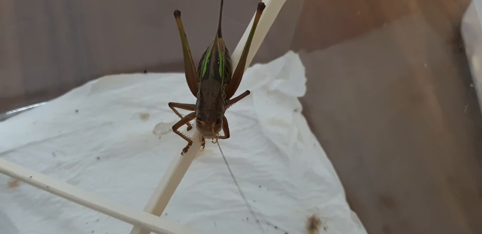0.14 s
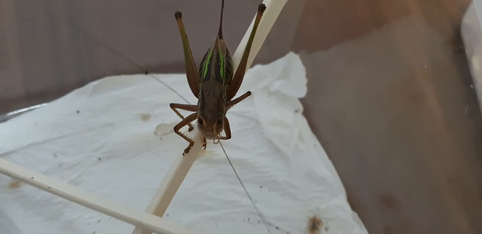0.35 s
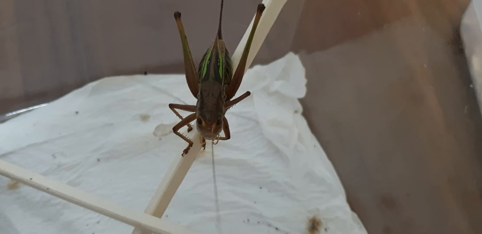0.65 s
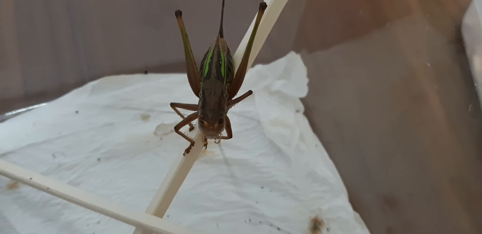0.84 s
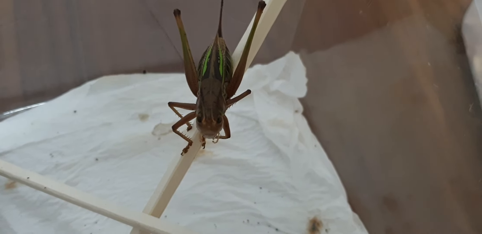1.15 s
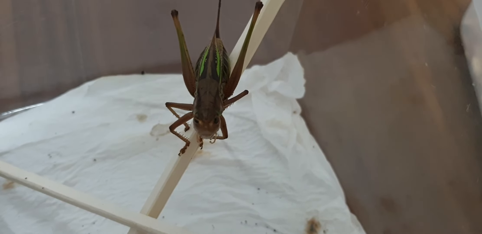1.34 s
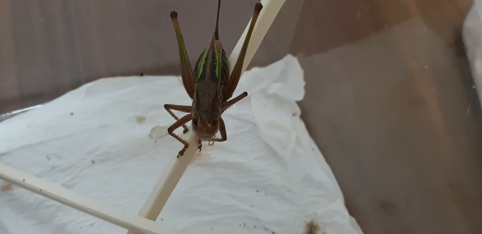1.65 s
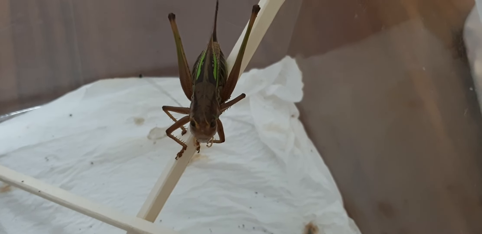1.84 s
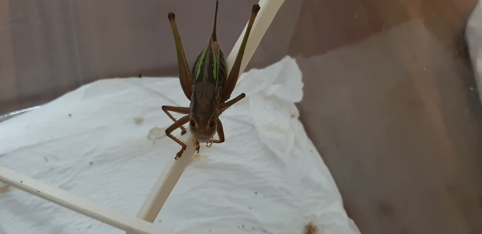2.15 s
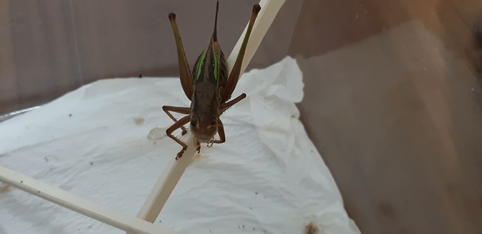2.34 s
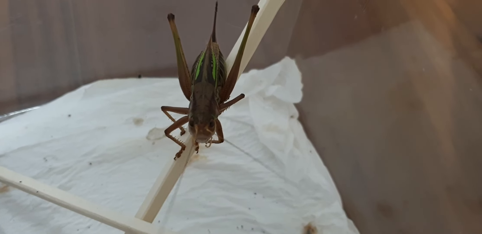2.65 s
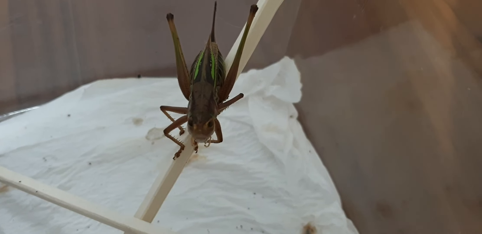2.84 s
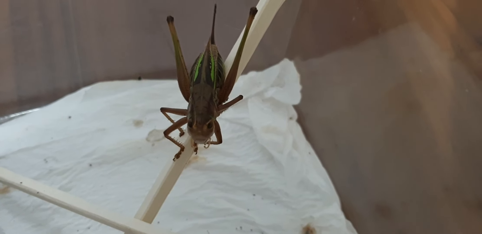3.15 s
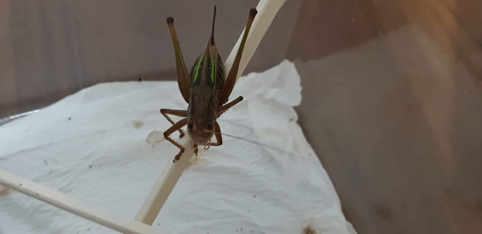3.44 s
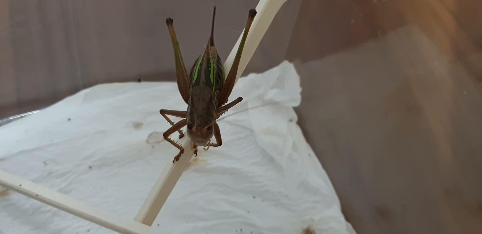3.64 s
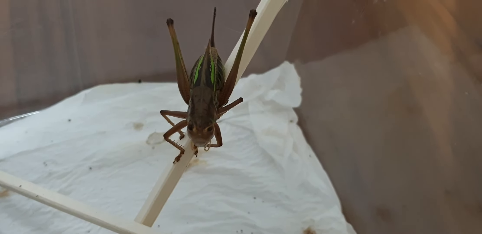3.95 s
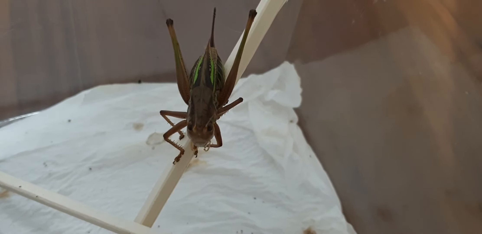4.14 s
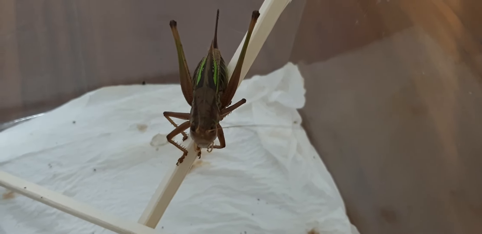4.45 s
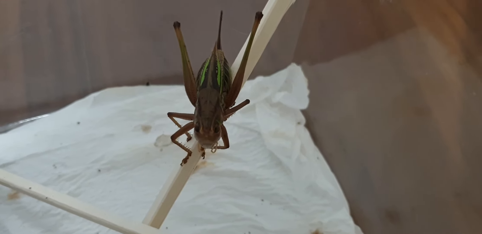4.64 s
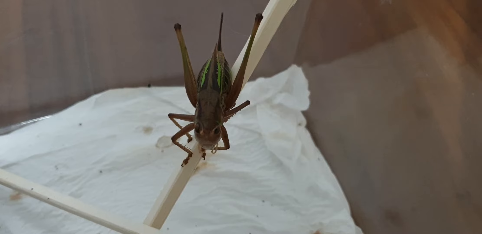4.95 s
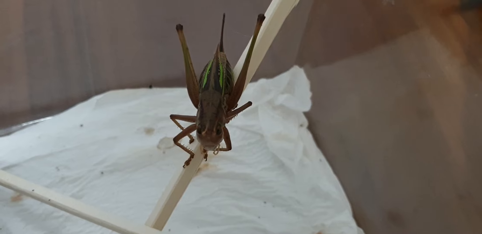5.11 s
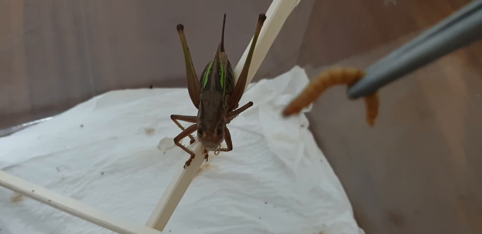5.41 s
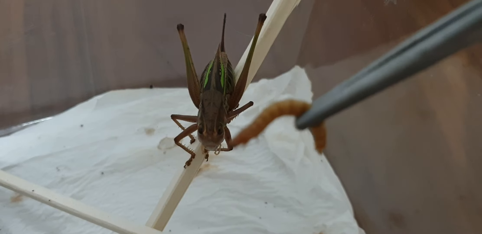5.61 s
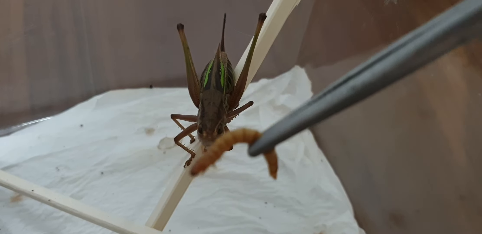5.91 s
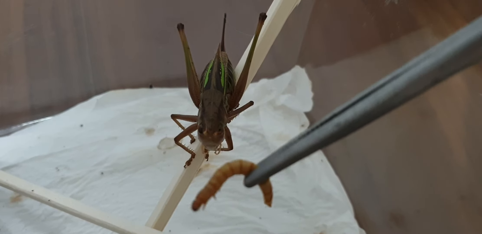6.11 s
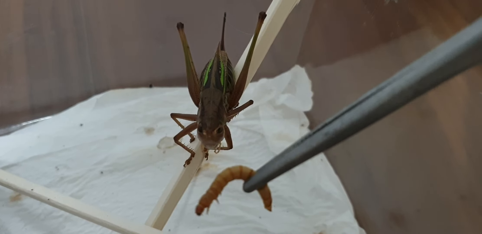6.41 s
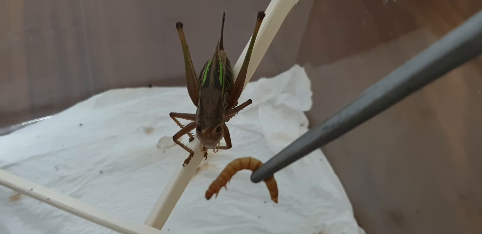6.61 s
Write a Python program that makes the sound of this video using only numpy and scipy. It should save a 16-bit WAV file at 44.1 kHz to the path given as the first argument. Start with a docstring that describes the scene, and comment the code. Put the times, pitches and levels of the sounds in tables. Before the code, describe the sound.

In a quiet indoor room with a low motor hum, a hand handles steel tweezers close by: soft skin and cloth rustle, dry ticks, a brief metallic chatter and faint high ringing. A small tub is tapped near two seconds as the hum swells and stays louder. Sparse rustles follow, then a sharp plastic box knock and a duller one. Close stereo phone microphone, little room echo.

```python
"""A quiet room hums (shaped noise, motor tones) while a hand to the right of a phone handles steel tweezers.
Skin and cloth rustle (banded grains); the tips tick (noise bursts), chatter and ring (steel modes).
From 1.7 s a small tub is tapped (struck modes and cracks), and around 1.8 s the background swells, then holds.
At 5.0 and 6.1 s a plastic box on the left is knocked, made like the tub; a bright burst edges the first knock."""
import sys
import numpy as np
from scipy import signal
from scipy.fft import rfft, irfft, next_fast_len
from scipy.io import wavfile
from scipy.ndimage import uniform_filter1d

SR = 44100
rng = np.random.default_rng(int(sys.argv[2]) if len(sys.argv) > 2 else 0)


def persist_wave(psi):
    """Save psi, clipped to +-1, as 16-bit WAV."""
    counts = np.round(np.clip(psi, -1, 1) * 32767).astype(np.int16)
    wavfile.write(sys.argv[1], SR, np.atleast_2d(counts).T)


N = 298557  # samples


def undb(db):
    """Gain of a level in dB."""
    return 10 ** (np.asarray(db) / 20)


def unit(x):
    """Scaled to rms 1."""
    return x / np.sqrt(np.mean(x ** 2))


def band(x, centre_hz, width_hz):
    """Two-pole resonance, gain 1 at its centre."""
    b, a = signal.iirpeak(min(centre_hz, 0.45 * SR), centre_hz / width_hz, fs=SR)
    return signal.lfilter(b, a, x)


def walk(rate_hz):
    """Random levels held 1 / rate_hz s, smoothed twice by a moving mean."""
    hold = int(SR / rate_hz)
    steps = np.repeat(rng.standard_normal(N // hold + 1), hold)
    return uniform_filter1d(uniform_filter1d(steps, hold), hold)[:N]


def sides(pan_db):
    """Left and right gains whose mean is 1; pan_db is left minus right."""
    gains = undb(np.array([pan_db, -pan_db]) / 2)
    return (2 * gains / gains.sum())[:, None]


def add(out, x, start_s):
    """Mix x into out from start_s on."""
    i = int(start_s * SR)
    out[:, i:i + x.shape[1]] += x[:, :N - i]


def ring(hz, t60_s, phase_rad=0.0):
    """One struck mode: a sine decaying 60 dB in t60_s."""
    t = np.arange(SR // 2) / SR
    return np.sin(2 * np.pi * hz * t + phase_rad) * np.exp(-np.log(1000) * t / t60_s)


def ticks():
    """Each tick is a short noise burst with its own colour, mostly the tips scraping as they meet."""
    # dry ticks of the tips; the last row is the bright edge of the first box knock:
    # (time [s], level [dB], colour [Hz], left minus right [dB])
    dry_ticks = [(0.1274, -45, 10700, -6.0), (0.375, -57, 9280, -6.5), (.426, -45, 2600, -5),
                 (0.6017, -31, 3770, -9), (0.6056, -26.5, 5950, 0), (0.6275, -36, 4860, -11),
                 (0.6343, -29, 4530, -5), (.6355, -33, 10400, -9), (0.845, -50, 6360, -5.0),
                 (0.9012, -27.5, 3900, -9), (0.9054, -22, 4740, -4), (.879, -46, 5000, -5),
                 (0.9437, -29, 11000, -11), (.9475, -33, 5000, -6), (.956, -38, 4500, -6),
                 (1.265, -54, 12900, 10), (1.7102, -23.5, 4200, -4), (1.7114, -25, 10000, -8),
                 (1.765, -34, 4250, -2), (1.8177, -43, 3000, -4), (1.827, -44, 4500, -4),
                 (1.939, -49, 13900, 3), (1.961, -45, 2580, 4), (2.054, -46, 10000, -8),
                 (2.2615, -51, 2610, -15), (2.296, -34, 6800, -17), (2.336, -44, 5100, -10),
                 (2.373, -39.5, 9000, -18.5), (2.6988, -41, 2480, -12), (2.8702, -47.5, 2500, -2),
                 (2.99, -36, 2890, 2), (2.9957, -33.5, 6000, -12), (4.865, -47.5, 13300, 0),
                 (4.971, -35, 11500, 3)]
    rise_s, fade_s = 0.0008, 0.0017  # at -40 dB
    longer_db_per_db = 0.2  # a harder tick lasts longer
    out, t = np.zeros((2, N)), np.arange(SR // 25) / SR
    noise = rng.standard_normal((len(dry_ticks), 3, len(t)))
    for (start_s, db, hz, pan_db), chance in zip(dry_ticks, noise):
        longer = undb(longer_db_per_db * (db + 40))
        burst = 0.8 * chance[:2] + 0.6 * chance[2]  # own and shared noise of the ports
        burst = burst * (1 - np.exp(-t / (rise_s * longer))) * np.exp(-t / (fade_s * longer))
        coloured = band(burst, hz, 0.6 * hz) + 0.35 * burst
        add(out, undb(db) * sides(pan_db) * coloured, start_s)
    return out


def steel():
    """Blows and a rapid chatter set the steel modes ringing; where it is struck picks the modes."""
    # modes of the tweezers: (frequency [Hz], level when the tips touch [dB], t60 [s],
    # level when knocked whole [dB])
    modes = [(2375, -24, .3, 2), (3820, -14, .09, -7), (4430, -13, .06, -30), (4900, -18, .06, -30),
             (5780, -20, .12, -18), (6190, -15, .09, -22), (6450, -10, .1, -26), (7430, -9, .12, -30),
             (7620, -22, .2, -9), (8380, -6, .12, -32), (8700, -5, .1, -24), (9150, -10, .07, -30),
             (9840, -5, .1, -30), (10100, -2, .14, -21), (11700, 1, .07, -11), (11950, -12, .16, -30),
             (12900, -12, .06, -15), (13400, -5, .07, -26), (14300, -11, .05, -26), (15300, -12, .06, -26)]
    # blows on the steel: (time [s], level [dB], favoured pitch [Hz], reach [octaves])
    pings = [(0.438, -52, 11700, .03), (0.470, -58, 10100, .02), (0.637, -32, 4430, .06),
             (.636, -44, 12900, .04), (.9445, -45, 11500, .04), (0.982, -41, 11950, .012),
             (1.070, -59, 9150, .03)]
    knock_s, knock_db = 1.2065, -55.5  # the closed tweezers knock against something and ring freely
    chatter_from_s, chatter_to_s, chatter_per_s = 0.51, 0.6, 1100  # tips chattering on each other
    chatter_start_db, chatter_growth_db_per_s = -79, 130
    out = np.zeros((2, N))
    phases = rng.uniform(0, 2 * np.pi, (len(modes), 2, 1))
    rings = np.array([ring(hz, t60_s, phase) for (hz, _, t60_s, _), phase in zip(modes, phases)])
    hz, tips_db, _, free_db = np.array(modes).T

    for start_s, db, at_hz, reach_oct in pings:
        share = 1 / (1 + (np.log2(hz / at_hz) / reach_oct) ** 2)
        add(out, np.tensordot(share * undb(db + tips_db), rings, 1), start_s)
    add(out, np.tensordot(undb(knock_db + free_db), rings, 1), knock_s)

    t = np.arange(N) / SR
    growth_db = chatter_growth_db_per_s * (np.minimum(t, chatter_to_s) - chatter_from_s)
    force = (t > chatter_from_s) * undb(chatter_start_db + growth_db)
    knocks = (rng.random(N) < chatter_per_s / SR) * rng.standard_normal(N) * force
    tips_ring = np.tensordot(undb(tips_db), rings, 1)
    chatter = signal.fftconvolve(knocks[None], tips_ring, axes=1)[:, :N]
    # the tips close and damp the ringing
    closing = np.clip((chatter_to_s - t) / 0.004, 0, 1)
    return (out + chatter * closing) * sides(-6.0)


def rustle():
    """Fibres slipping: fine grains in a bright, a dull, a scraping and a low band, each port hearing its own."""
    # strokes of skin and cloth: (peak time [s], bright level [dB], time to rise 20 dB [s],
    # time to fall 20 dB [s], dull share [dB], scraping share [dB])
    strokes = [(.15, -70.5, 0.12, .11, 0, 4), (.405, -58, .022, 0.16, -4, 0),
               (.48, -65, 0.07, 0.24, -7, -9), (.58, -63.5, .12, 0.16, -9, -5),
               (.63, -58, 0.0553, 0.11, 2, 2.5), (.72, -67, 0.17, 0.15, -3, -7.5),
               (.868, -60, 0.03, 0.07, -1, -0.5), (.93, -59.5, .06, 0.09, 10, 6),
               (.975, -62.5, .06, 0.16, -0.5, -6), (1.56, -73, 0.3, 1.2, -6.5, -12),
               (1.73, -60.5, .03, 0.23, 3, 1), (1.825, -67, 0.14, 0.14, 7, 12),
               (2.03, -76, 0.7, 0.5, 0.5, 4), (2.29, -66.5, .08, 0.37, 4.5, -3),
               (2.39, -63, .2, .5, -5, -11), (2.56, -72, .3, 0.3, -10, -12.5),
               (2.65, -76.5, 0.1, 0.34, 6.5, -8), (3.01, -62, 0.04, 0.12, -1, 3), (3.2, -78, 1, 0.3, 3, -3),
               (3.75, -75, .08, 0.35, 6, -8), (3.99, -74, .14, .3, -1, -12), (4.32, -68, .25, 0.2, -8, -14),
               (4.5, -75, .3, 1.5, -7, -14), (4.87, -64, .01, .2, -10, -15)]
    low_share_db, pan_db = -2, -5
    snags_per_s, snag_s, snag_db = 450, 0.0008, -5  # fibres that catch and let go
    t, power = np.arange(N) / SR, np.zeros((4, N))
    for peak_s, db, rise_s, fall_s, dull_db, scrape_db in strokes:
        stroke_db = db - 20 * np.where(t < peak_s, (peak_s - t) / rise_s, (t - peak_s) / fall_s)
        shares = undb([[0], [dull_db], [scrape_db], [low_share_db]])
        power = power + (undb(stroke_db) * shares) ** 2

    grains = rng.standard_normal((4, 2, N)) * undb(1.2 * rng.exponential(size=(4, 2, N)))
    catches = (rng.random(N) < snags_per_s / SR) * rng.exponential(size=N)
    decay = np.exp(-1 / (snag_s * SR))
    snags = 1 + undb(snag_db) * signal.lfilter([1], [1, -decay], catches)
    grains[1:3] *= snags
    grains[0] *= np.sqrt(snags)

    bright = unit(band(grains[0], 11000, 4200)) * undb(1.6 * walk(54))
    dull = unit(band(grains[1], 5400, 2600)) * undb(2.4 * walk(40))
    scrape = unit(band(grains[2], 2270, 860)) * undb(4.6 * walk(90))
    low = unit(band(grains[3], 770, 350)) * undb(3.0 * walk(40))
    mix = sum(x * np.sqrt(p) for x, p in zip((bright, dull, scrape, low), power))
    return mix * sides(pan_db)


def struck(modes, long_mode, blows, crack_db, crack_pan_db, lag_s):
    """A rattling contact drives the modes and cracks; a soft blow loses the treble, a glancing one the bass.
    Rows: left, right, what goes into the room."""
    # modes above this are sent less to the room, so their echoes stay short; the crack is sent in full
    room_send_hz = 1800
    out, t = np.zeros((3, N)), np.arange(SR // 2) / SR
    noise = rng.standard_normal((len(blows), 3, len(t)))
    lag_rad_per_hz = np.array([[0], [-2 * np.pi * lag_s], [0]])  # right port after left if lag_s > 0
    crack_gains = undb(crack_db) * np.vstack([sides(crack_pan_db), [1]])
    long_hz, long_t60_s, long_pan_db = long_mode
    for (start_s, db, hard_hz, thin_hz, long_db), chance in zip(blows, noise):
        x = np.zeros((3, len(t)))
        struck_modes = [*modes, (long_hz, long_db, long_t60_s, long_pan_db)]
        for k, (hz, mode_db, t60_s, pan_db) in enumerate(struck_modes):
            sign = -(-1) ** k  # neighbouring modes start in opposite directions
            to_room = 1 / (1 + (hz / room_send_hz) ** 2)
            gains = sign * undb(mode_db) * np.vstack([sides(pan_db), [to_room]])
            x = x + gains * ring(hz, t60_s, lag_rad_per_hz * hz)
        contact = 0.05 * chance[2, :300] * np.exp(-t[:300] / 0.0025)
        contact[0] = 1
        x = signal.fftconvolve(x, contact[None], axes=1)[:, :len(t)]
        x = x + crack_gains * chance * np.exp(-t / 0.0035)
        x = signal.lfilter(*signal.butter(N=2, Wn=thin_hz, btype="high", fs=SR), x)
        x = signal.lfilter(*signal.butter(N=3, Wn=min(hard_hz, 0.45 * SR), fs=SR), x)
        add(out, undb(db) * x, start_s)
    return out


def tub():
    """Taps excite the short modes of a small tub on the right and of its hollow."""
    # walls: (frequency [Hz], level [dB], t60 [s], left minus right [dB])
    modes = [(310, -13, 0.05, 6), (560, -13, .04, 0), (664, -14, 0.028, -12), (890, -16, 0.025, -12),
             (1278, -16, .04, 1), (1605, -6.5, 0.023, -10), (2080, -9, 0.023, -2), (2800, -10, .015, -4)]
    # its hollow: (frequency [Hz], t60 [s], left minus right [dB])
    hollow = (427, 0.048, 4.3)
    # taps: (time [s], level [dB], hardness: low-pass [Hz], thinness: high-pass [Hz], hollow level [dB])
    taps = [(1.7108, -22, 6000, 100, -7), (1.7656, -33.5, 4000, 100, -13.5), (1.961, -39, 4900, 875, -6),
            (2.9898, -28.5, 6100, 400, -24), (2.998, -30.5, 3000, 150, -8)]
    return struck(modes, hollow, taps, crack_db=-5.5, crack_pan_db=3.0, lag_s=-0.0002)


def box():
    """Knocks excite the modes of a plastic box on the left; its lid mode rings longest."""
    # box: (frequency [Hz], level [dB], t60 [s], left minus right [dB])
    modes = [(123, -20, 0.11, -11), (197, -15.5, 0.073, 5), (270.6, -10.5, 0.083, 27),
             (344, -21.5, 0.1, 25), (452, -20, 0.064, 14), (506, -17, 0.088, 10), (712, -18, 0.091, -3),
             (862, -20, 0.069, 9), (984, -18, 0.06, 2), (1100, -13.5, 0.083, 3), (1394, -11.5, 0.03, 16),
             (1664, -8.5, 0.025, 16), (2044, -11.5, 0.034, 10.5), (1850, -12, .022, 8),
             (2485, -15, 0.04, 7), (2690, -19, 0.04, 2), (2910, -18, .03, 5), (3280, -23, 0.025, 8),
             (4090, -11, 0.045, 6), (6520, -25, .02, 10), (6740, -18, 0.018, 13)]
    # lid: (frequency [Hz], t60 [s], left minus right [dB])
    lid = (571, 0.12, 8.5)
    # knocks: (time [s], level [dB], hardness: low-pass [Hz], thinness: high-pass [Hz], lid level [dB])
    knocks = [(4.9700, -30, 5000, 300, -30), (4.9716, -15.5, 5800, 60.6, -25.5),
              (4.9848, -24.5, 1300, 60.3, -18), (5.006, -33, 900, 60, -21), (6.1303, -19, 2000, 160, -12),
              (6.1335, -22, 2000, 1200, -20), (6.1455, -27, 1700, 298, -1)]
    return struck(modes, lid, knocks, crack_db=-4.5, crack_pan_db=5.5, lag_s=0.00031)


def room(x):
    """Dense echoes, other ones at each port; the treble dies sooner."""
    level_db, t60_s, dull_hz = -9.5, 0.3, 4960
    t = np.arange(SR // 2) / SR
    noise = rng.standard_normal((2, len(t)))
    low = signal.lfilter(*signal.butter(1, dull_hz, fs=SR), noise)
    tail = low * undb(-60 * t / t60_s) + (noise - low) * undb(-60 * t / (0.36 * t60_s))
    tail = tail * np.clip((t - 0.004) / 0.0046, 0, 1)
    tail = tail / np.sqrt(np.sum(tail ** 2) / 2)
    return undb(level_db) * signal.fftconvolve(x[None], tail, axes=1)[:, :N]


def background():
    """Broad noise and room resonances at two ports, with thin motor tones, all on one swell."""
    # broad room noise: (frequency [Hz], relative density [dB per Hz])
    air = np.array([(20, -59), (35, -14.5), (70, -7.5), (140, -16), (400, -20), (490, -29.5), (800, -21.5),
                    (1200, -27), (1290, -33), (1750, -32), (2400, -38.5), (2900, -50), (6000, -50.5),
                    (8300, -56.5), (10000, -51.5), (15600, -53.5), (16100, -94)])
    # room resonances fed by the rumble: (frequency [Hz], width [Hz], level over the background [dB])
    booms = [(51, 14, -1.5), (109.4, 12.8, 9.5), (176.8, 14.4, -2), (238.2, 14.4, -2), (287.1, 13.5, -3),
             (348.2, 15.6, -6)]
    # thin tones of a distant motor: (frequency [Hz], level over the background [dB])
    whines = [(600, -7), (716, -21), (808, -7.5), (925, -28.5), (1039, -9), (1216, -9)]
    # two microphone ports: (frequency [Hz], likeness [0-1], left lead [rad], left minus right [dB])
    ports = np.array([(50, 0.98, .5, -3.5), (109, .99, 0.05, -0.5), (225, 0.79, -0.5, -2.5),
                      (430, 0.43, 0.45, 0.5), (867, 0.58, -1.74, 0), (1640, 0.15, -2.5, 0),
                      (4000, 0.16, -2.5, 1.5), (12100, 0, -4.5, 0)])
    air_db = 8.5  # over the background level
    quiet_db, swollen_db, swell_mid_s, swell_pace_s = -67.5, -57.5, 1.81, 0.2
    size = next_fast_len(N)
    hz = np.maximum(np.arange(size // 2 + 1) * SR / size, 1)
    log_hz = np.log(hz)

    broad = undb(np.interp(log_hz, np.log(air[:, 0]), air[:, 1])) ** 2
    power = undb(air_db) ** 2 * broad / broad.sum()
    for centre_hz, width_hz, db in booms:
        shape = 1 / (1 + (2 * (hz - centre_hz) / width_hz) ** 4)
        power = power + undb(db) ** 2 * shape / shape.sum()

    like, lead_rad, pan_db = (np.interp(log_hz, np.log(ports[:, 0]), ports[:, k]) for k in (1, 2, 3))
    like = np.clip(like, 0, 1)
    a, b = rfft(rng.standard_normal((2, size)))
    left = a * np.exp(1j * lead_rad) * undb(pan_db / 2)
    right = (like * a + np.sqrt(1 - like ** 2) * b) * undb(-pan_db / 2)
    noise = irfft(np.array([left, right]) * np.sqrt(power * size / 2), size)[:, :N]

    t = np.arange(N) / SR
    for tone_hz, db in whines:
        # the motor speed wavers, so each tone is a little smeared
        start_rad = rng.uniform(0, 2 * np.pi, (2, 1))
        phase_rad = 2 * np.pi * tone_hz * t + 2.98 * walk(10) + start_rad
        noise = noise + undb(db + 2.0 * walk(3.14)) * np.sin(phase_rad)
    swell = 1 / (1 + np.exp((swell_mid_s - t) / swell_pace_s))
    return noise * undb(quiet_db + (swollen_db - quiet_db) * swell)


def scene():
    """Tweezers, tub and box sound in the room; rustle and background are added without echoes."""
    tweezers = ticks() + steel()
    plastic = box() + tub()
    echoes = room(tweezers.mean(axis=0) + plastic[2])
    return tweezers + plastic[:2] + echoes + rustle() + background()


def record(dry):
    """A steep elliptic low-pass; nothing is heard above about 16.5 kHz."""
    top_hz = 16550
    return signal.sosfilt(signal.ellip(10, 0.2, 80, top_hz, fs=SR, output="sos"), dry)


dry = scene()
out = record(dry)
persist_wave(out)
```